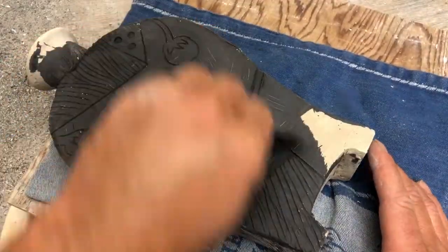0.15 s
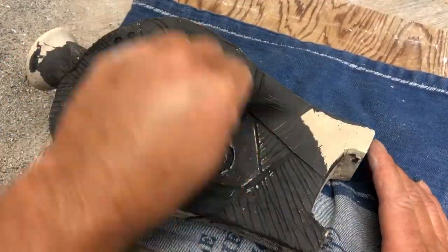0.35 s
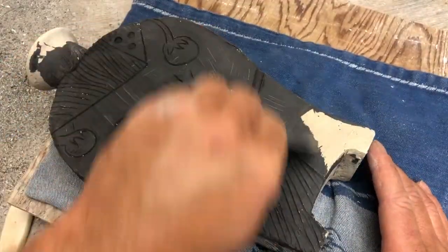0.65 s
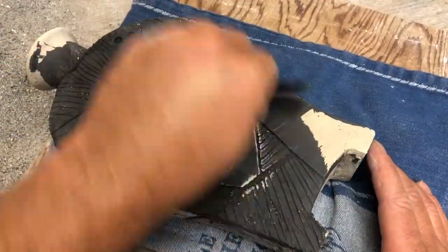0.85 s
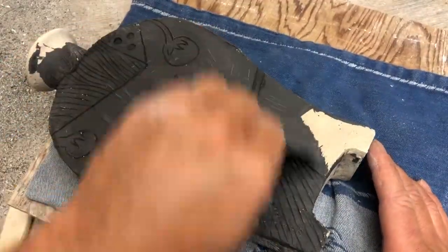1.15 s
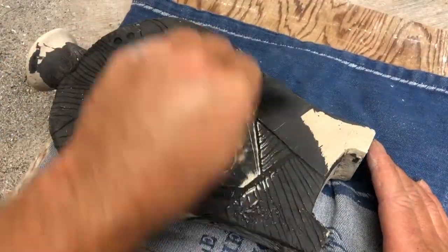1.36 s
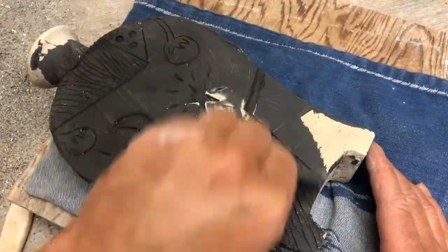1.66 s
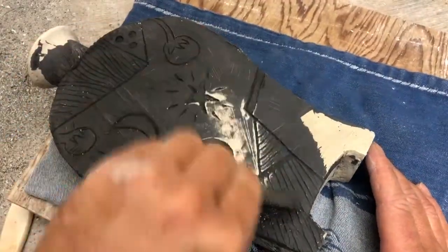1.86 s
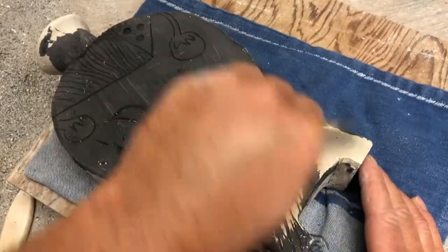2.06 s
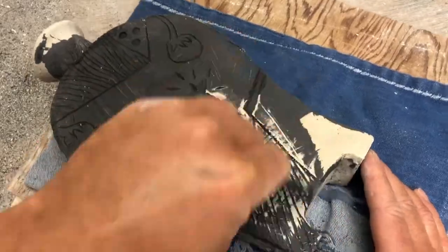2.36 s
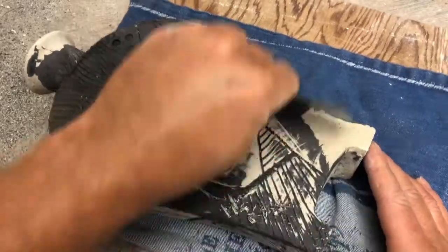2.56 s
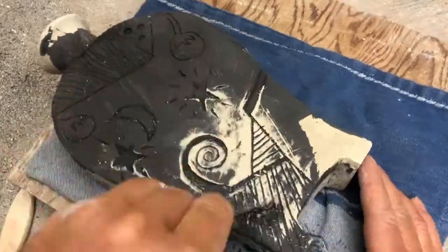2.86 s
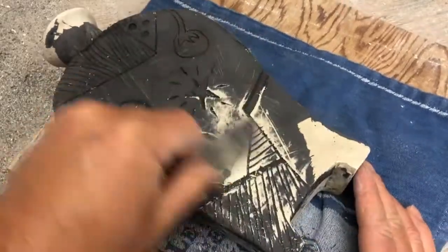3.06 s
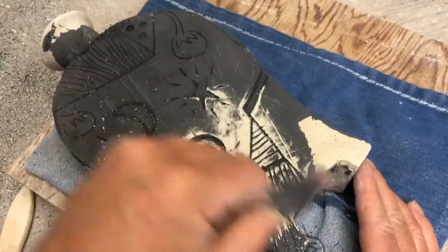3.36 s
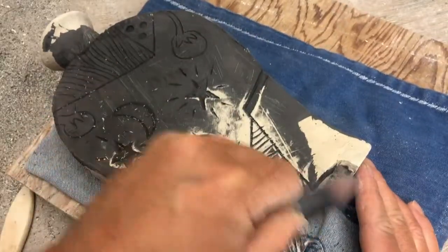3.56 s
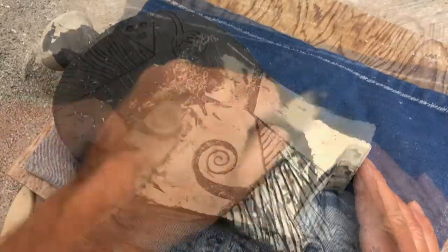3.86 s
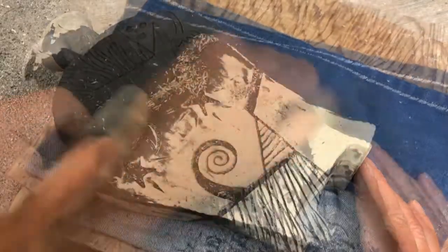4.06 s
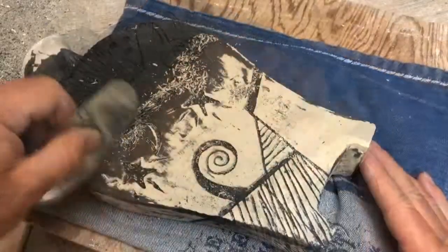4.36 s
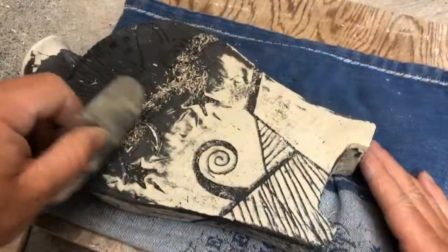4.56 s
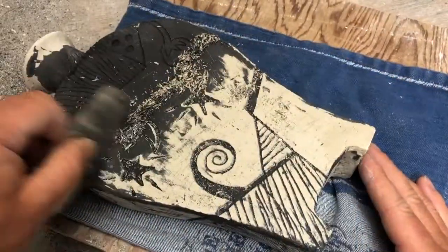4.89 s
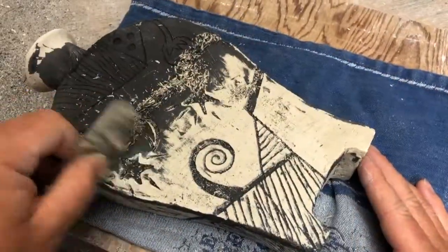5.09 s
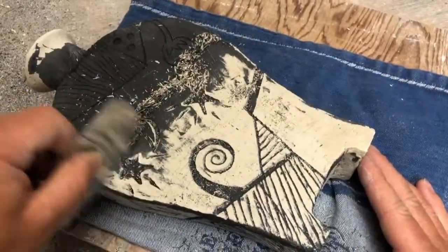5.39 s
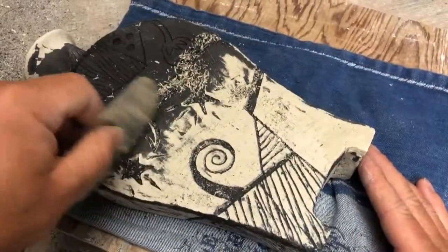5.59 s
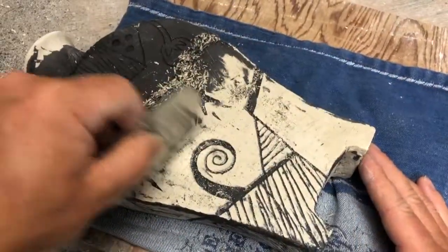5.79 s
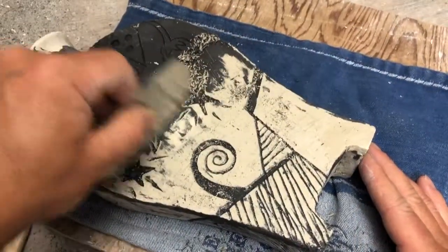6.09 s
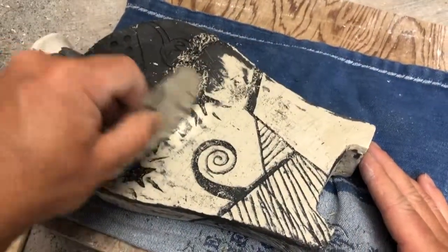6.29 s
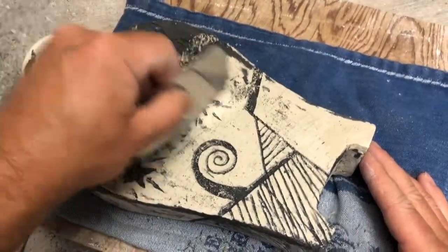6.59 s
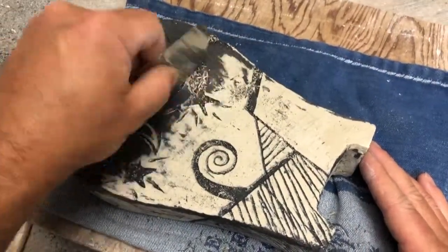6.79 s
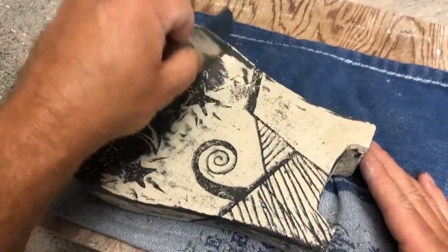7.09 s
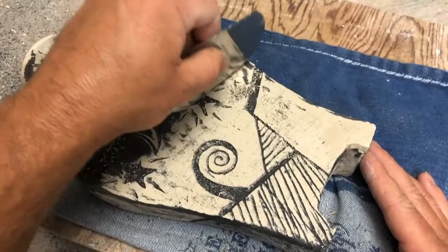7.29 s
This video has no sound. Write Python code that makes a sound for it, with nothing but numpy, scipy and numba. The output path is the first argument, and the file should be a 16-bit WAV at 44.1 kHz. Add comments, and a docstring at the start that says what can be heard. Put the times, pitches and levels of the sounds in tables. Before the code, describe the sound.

A thin steel blade scrapes dry, gritty coating off a hollow clay form in short repeated rasps, with soft knocks and snaps.

```python
"""Gritty rasps follow one another, each opened by a tick and a low knock, with snaps in between.
A thin steel rib scrapes dry underglaze off a hollow clay form lying on cloth on a work table.
Random grains of force drive the rasp, powder hiss, blade and clay; landings and snags ring decaying modes.
Each landing rocks the table, and twice the form creeps on the cloth with a short groan.
A small studio, close microphone: a short reverb, with steady rumble, hiss and a faint high whine."""
import sys
import numpy as np
from scipy import signal
from scipy.fft import rfft, irfft
from scipy.io import wavfile
from scipy.ndimage import uniform_filter1d, map_coordinates
from numba import njit

SR = 44100
rng = np.random.default_rng(int(sys.argv[2]) if len(sys.argv) > 2 else 0)


def master(y):
    """Save y as 16-bit WAV."""
    cut = np.clip(np.atleast_2d(y).T, -1, 1)
    pcm = np.round(cut * 32767)  # scale
    wavfile.write(sys.argv[1], SR, pcm.astype(np.int16))


N = 328118
RING = np.arange(SR // 2) / SR  # time axis of one event [s]

# All levels in the tables are relative; each source function adds its own trims.
# Steady air of the studio: (frequency [Hz], density [dB per Hz])
STUDIO_SPECTRUM = [(20, -6.5), (42, 3), (104, -14.5), (368, -16), (552, -26.5), (997, -31.5), (2850, -35.5),
                   (4500, -33), (6730, -38.5), (10900, -40), (15500, -49.5)]
# The table rocking: (frequency [Hz], level [dB], t60 [s])
TABLE_MODES = [(80.1, 1.5, 0.17), (43, -6, 0.61)]
# The form creeps on the cloth: (start [s], length [s], first pitch [Hz], last pitch [Hz], level [dB])
CREEP_GROANS = [(3.031, 0.067, 197, 93.5, -42), (6.194, 0.06, 168, 126, -44)]
# The edge snags in a groove: (time [s], level [dB], treble share [dB])
GROOVE_SNAGS = [(.346, -38.5, -5), (2.283, -34, -3), (2.298, -33, -24), (2.675, -33.5, -8),
                (2.705, -32, -16), (2.739, -28, -18), (3.128, -28, -30), (3.881, -37.5, 7),
                (3.958, -37, -18), (3.984, -32.5, 7.5), (4.335, -38, -9), (4.768, -38, 10),
                (4.818, -23.5, -26), (5.137, -37, 6), (5.152, -33, -14), (5.427, -33.5, 9.5),
                (5.477, -8, -21), (5.742, -30.5, 5.5), (5.83, -9, -32), (6.175, -31, -13),
                (6.757, -32.5, 4), (7.158, -33.5, 10)]
# The blade lands: (time [s], tick [dB], knock [dB], table thump [dB], ping relative to the tick [dB])
BLADE_LANDINGS = [(.196, -53, -53, -39.5, -15), (.712, -49, -51.5, -37.5, 3),
                  (1.171, -55.5, -49.5, -40, -1), (1.688, -53.5, -54, -40, -18),
                  (2.153, -58, -54, -42, -12), (2.578, -52, -48, -34, -2), (2.998, -53, -51.5, -35.5, 3.5),
                  (3.393, -53.5, -47.5, -34, 1), (3.804, -58, -45.5, -32, -8),
                  (4.229, -57, -58, -38.5, -24), (4.694, -47, -66, -38.5, -22),
                  (5.061, -42.5, -58.5, -33, -6), (5.368, -49.5, -55, -27, -8),
                  (5.709, -54, -69, -29.5, -27), (6.101, -44, -66, -32.5, -6),
                  (6.552, -59.5, -66, -42.5, -20), (7.004, -47.5, -60, -31, -7),
                  (7.378, -53, -54.5, -34, -20)]
# Scraping strokes: (start [s], lift [s], level [dB], hardest moment [share of stroke 0-1],
# powder hiss [dB], clay body [dB], blade ring [dB], flex ring [dB])
SCRAPE_STROKES = [(.206, 0.437, -44.5, 0.57, -3, 0.5, -0.5, -1), (.729, 0.944, -45, 0.43, -3.5, 0, -3, -4),
                  (1.2, 1.432, -44.5, 0.55, -2.5, -2, -2, -4.5),
                  (1.703, 1.905, -42.5, 0.37, -1, -2, -3, -0.5),
                  (2.162, 2.371, -42.5, 0.52, 1, -4.5, -0.5, 0.5),
                  (2.596, 2.75, -45.5, 0.4, -1, 1, -2, 2.5), (3.007, 3.19, -51, 0.38, -2, 2, -3, -3),
                  (3.407, 3.588, -49, 0.22, -2.5, 2.5, -2, -6.5),
                  (3.835, 4.016, -46, 0.54, -3, -0.5, -2, -7),
                  (4.237, 4.399, -46.5, 0.48, -2.5, -0.5, -3.5, -6.5),
                  (4.702, 4.854, -49, 0.47, -1.5, 5, -4, -6),
                  (5.071, 5.192, -44.5, 0.33, -5.5, -1, -32, -20.5),
                  (5.4, 5.497, -46.5, 1, 3, 5, -16, -14.5), (5.737, 5.862, -44, 0.8, -1, 1, -30, -30),
                  (6.112, 6.192, -42, 0.86, -1.5, 4, -30, -30),
                  (6.564, 6.771, -47.5, 0.39, 1, 1.5, -1.5, -6.5),
                  (7.011, 7.183, -45.5, 0.39, 0.5, -1.5, -4, -12),
                  (7.4, 7.527, -40.5, 0.22, -3.5, -8, -9.5, -24)]
# The blade brushes the clay on its way back: (start [s], lift [s], level [dB])
RETURN_BRUSHES = [(0.691, 0.698, -55), (4.142, 4.169, -59.5), (4.469, 4.561, -59.5), (6.288, 6.374, -70.5),
                  (6.883, 6.942, -57), (6.963, 6.988, -57)]
# Every brush: (hardest moment [0-1], powder hiss [dB], clay body [dB], blade ring [dB], flex ring [dB])
BRUSH_CHARACTER = (0.7, -2.5, -5, -11, -3.5)
# Hollow clay form: (frequency [Hz], level [dB], t60 [s])
CLAY_MODES = [(745, 2, 0.045), (910, 1, 0.045), (1088, 2, 0.034), (1367, -7.5, 0.095), (1562, -6, 0.13),
              (1766, -4, 0.11), (1890, -3.5, 0.045), (2554, 7.5, 0.032), (3760, -7.5, 0.032),
              (4610, -7, 0.092)]
# The form knocking on its padding: (frequency [Hz], level [dB], t60 [s])
KNOCK_MODES = [(200.6, -3, 0.28), (258.3, -1, 0.069), (356, 5, 0.11), (593, -14.5, 0.081)]
# The form's belly under the dragging edge: (frequency [Hz], level [dB])
BELLY_MODES = [(750, -5.5), (2600, -2), (3650, 1.5), (4750, 0), (7300, -0.5)]
# Short rings of the wall where the blade lands: (nominal frequency [Hz], level [dB])
WALL_MODES = [(800, 4.5), (1430, 0.5), (2180, -3.5), (2850, 0), (3700, -4.5), (5000, -8.5)]
# How freely the form rings where the tool works, most over its hollow belly: (time [s], level [dB])
HOLLOWNESS = [(4.4, -1), (4.7, 1), (6.2, -3.5), (6.6, -4)]
# The blade's ping drops as the grip shifts: (time [s], nominal frequency [Hz])
PING_PITCH = [(4.2, 2906), (5.06, 2200)]
# Modes of the steel rib: (mid-stroke frequency [Hz], rise over a stroke [share], width [Hz])
BLADE_RING = (3000, .08, 320)
FLEX_RING = (2100, .55, 380)
# Spectra of edge, flying powder, clay body, snap and tick: (frequency [Hz], density [dB per Hz])
RASP_SPECTRUM = [(300, -23), (950, 7), (1300, 0.5), (2600, 1.5), (5500, 7.5), (7000, -5.5), (15000, -9)]
POWDER_SPECTRUM = [(2500, -22), (5000, -22.5), (6500, 9), (8000, 11), (9300, 12), (12000, 12), (13500, 5),
                   (16000, -6)]
BODY_SPECTRUM = [(60, 12), (250, -5), (450, 1), (700, -2), (1050, 0), (1500, 1), (2300, -19.5),
                 (5000, -71.5)]
SNAP_SPECTRUM = [(200, -10), (600, -5), (1400, -1), (2600, -6), (3200, -12.5), (4000, -6.5), (8000, -15.5),
                 (15000, -41)]
TICK_SPECTRUM = [(500, -4.5), (2500, -3), (9000, -22), (15000, -32)]


def undb(db):
    """Decibels to gain."""
    return 10 ** (np.asarray(db) / 20)


def unit(response):
    """Scale a response to energy 1."""
    return response / np.sqrt(np.sum(response ** 2))


def through(x, response):
    """Pass a sound through a response."""
    return signal.fftconvolve(x, response)[:len(x)]


def add(track, s, sound):
    """Mix a sound into a track at time s."""
    i = int(s * SR)
    track[i:i + len(sound)] += sound[:max(N - i, 0)]


def colour(points, size=len(RING)):
    """Minimum-phase response with the given spectrum, energy 1."""
    hz, db = np.transpose(points)
    grid = np.maximum(np.fft.rfftfreq(size, 1 / SR), 1)
    gain = undb(np.interp(np.log(grid), np.log(hz), db))
    cepstrum = irfft(np.log(gain))
    # folding the cepstrum makes the response causal
    cepstrum[1:size // 2] *= 2
    cepstrum[size // 2 + 1:] = 0
    return unit(irfft(np.exp(rfft(cepstrum))))


def modes(mode_table):
    """Decaying sines; neighbouring modes swing in opposite directions."""
    total = np.zeros(len(RING))
    for k, (hz, db, t60) in enumerate(mode_table):
        decay = undb(db - 60 * RING / t60)
        total += (-1) ** k * decay * np.sin(2 * np.pi * hz * RING)
    return total


def walk(rate, count):
    """Random wander in straight lines between normal draws of spread 1, about rate draws per second."""
    step = max(int(SR / rate), 1)
    points = rng.standard_normal(count // step + 2)
    return np.interp(np.arange(count) / step, np.arange(len(points)), points)


@njit
def resonance(x, hz, width):
    """State-variable band-pass with a moving centre."""
    y, band, low = np.empty(len(x)), 0., 0.
    for i in range(len(x)):
        g, k = np.tan(np.pi * hz[i] / SR), width / hz[i]
        v = (band + g * (x[i] - low)) / (1 + g * (g + k))
        band, low, y[i] = 2 * v - band, low + 2 * g * v, k * v
    return y


def hollow(s):
    """How freely the form rings under the tool at time s; dB."""
    return np.interp(s, *np.transpose(HOLLOWNESS))


def studio():
    """Steady room rumble and hiss from shaped noise, with a faint high whine from a narrow resonance."""
    air_db, whine_db = -59, -87
    whine_hz, whine_width_hz = 11300.0, 40.0
    air = through(rng.standard_normal(N), colour(STUDIO_SPECTRUM))
    whine = resonance(rng.standard_normal(N), np.full(N, whine_hz), whine_width_hz)
    return undb(air_db) * air + undb(whine_db) * whine / np.std(whine)


def room(x):
    """Dense early reflections from the work table, then the walls' tail; the treble dies first."""
    early_db, wet_db, treble_db = -8, -10, -1
    early_t60, low_t60, high_t60 = 0.11, 0.31, 0.27  # s
    first_s, split_hz = 0.0028, 5000
    noise = rng.standard_normal((3, len(RING))) * (RING > first_s)
    low = signal.sosfilt(signal.butter(2, split_hz, fs=SR, output="sos"), noise[0])
    high = signal.sosfilt(signal.butter(2, split_hz, "high", fs=SR, output="sos"), noise[1])
    fade = -np.log(1000) * RING
    tail = low * np.exp(fade / low_t60) + undb(treble_db) * high * np.exp(fade / high_t60)
    early = noise[2] * np.exp(fade / early_t60)
    return x + through(x, undb(early_db) * unit(early) + undb(wet_db) * unit(tail))


def table():
    """The hand's weight rocks the table; the drag keeps it trembling, and it springs back at the lift."""
    lag_s, push_s, drag_s = 0.01035, 0.0094, 0.17
    thump_db, drag_db, rebound_db = 5.5, -11, 7
    rock = modes(TABLE_MODES)
    push = np.sin(np.pi * np.minimum(RING / push_s, 1)) ** 2
    thump = through(rock, push / push.sum())
    out = np.zeros(N)
    for s, _, _, db, _ in BLADE_LANDINGS:
        drag = rng.standard_normal(len(RING)) * np.exp(-RING / drag_s)
        tremble = through(drag, unit(rock))
        add(out, s + lag_s, undb(db) * (undb(thump_db) * thump + undb(drag_db) * tremble))
    for _, lift, db, *_ in SCRAPE_STROKES:
        add(out, lift - push_s, -undb(db + rebound_db) * thump)
    return out


def creeping():
    """The form slips on the cloth in a few slowing cycles."""
    out = np.zeros(N)
    for s, length, first_hz, last_hz, db in CREEP_GROANS:
        progress = np.minimum(RING / length, 1)
        pitch = first_hz * (last_hz / first_hz) ** progress
        phase = 2 * np.pi * np.cumsum(pitch) / SR
        cycles = np.sin(phase) + 0.15 * np.sin(2 * phase)
        swell = np.sqrt(4 * progress * (1 - progress))
        add(out, s, undb(db) * swell * cycles)
    return out


def crack(points, chatter_s, chatter_db):
    """A sharp contact, then a brief chatter of the edge, evened out to the given spectrum; energy 1."""
    chatter = rng.standard_normal(len(RING)) * np.exp(-RING / chatter_s)
    force = undb(chatter_db) * unit(chatter)
    force[0] += 1
    hz, db = np.transpose(points)
    grid = np.fft.rfftfreq(len(RING), 1 / SR)[1:]
    # subtract the force's own smoothed spectrum from the wanted one
    ripple = 10 * np.log10(uniform_filter1d(np.abs(rfft(force)) ** 2, size=60)[1:])
    wanted = np.interp(np.log(grid), np.log(hz), db)
    return unit(through(force, colour(np.column_stack([grid, wanted - ripple]))))


def snags():
    """The edge leaves a groove: a light snag stutters out, a hard one snaps quickly against the clay."""
    snap_db, clay_db, chips_db = 10, -2.5, -8
    hard_db, hard_span_db = -14, 16  # level of a fully hard snag, and the fall to a fully light one
    snap_s, stutter_s = 0.0022, 0.0038
    clay = unit(modes(CLAY_MODES))
    out = np.zeros(N)
    for s, db, treble in GROOVE_SNAGS:
        lightness = np.clip((hard_db - db) / hard_span_db, 0, 1)
        chatter_s = snap_s + lightness * (stutter_s - snap_s)
        snap = crack(SNAP_SPECTRUM, chatter_s, chatter_db=17)
        chips = undb(treble + chips_db) * crack(POWDER_SPECTRUM, chatter_s=0.0028, chatter_db=6)
        add(out, s, undb(db + snap_db) * (snap + chips + undb(clay_db + hollow(s)) * clay))
    return out


def landings():
    """The blade ticks and pings on the clay wall; the form knocks on its padding, damped by the hand."""
    tick_db, wall_db, knock_db, clay_db, ping_db = 21, 3, 5, -8, 2
    wall_t60, ping_t60 = 0.031, 0.028  # s
    most_damping = 18  # per second
    clay = unit(modes(CLAY_MODES))
    out = np.zeros(N)
    for s, tick, blow, _, ring in BLADE_LANDINGS:
        # grip and damping differ a little each time
        grip = 1 + .025 * rng.uniform(-1, 1)
        hold = rng.random()
        ping_hz = np.interp(s, *np.transpose(PING_PITCH)) * grip
        ping = unit(modes([(ping_hz, 0, ping_t60)]))
        wall = unit(modes([(hz * grip, db, wall_t60) for hz, db in WALL_MODES]))
        knock = modes(KNOCK_MODES) * np.exp(-RING * most_damping * hold)
        touch = crack(TICK_SPECTRUM, chatter_s=0.0029, chatter_db=20)
        touch += undb(wall_db) * wall + undb(clay_db + hollow(s)) * clay
        touch += undb(ping_db + ring) * ping
        add(out, s, undb(tick + tick_db) * touch - undb(blow + knock_db) * knock)
    return out


def grit(count, rate=9000, spread_db=1.0):
    """Grains of all sizes break off, rate per second, under an edge that judders over patches; rms 1."""
    breaks = rng.random(count) < rate / SR
    size = undb(spread_db * np.minimum(rng.exponential(size=count), 5))
    size = size * rng.choice([-1, 1], count)
    judder_db = 3.0 * walk(330, count)
    patches_db = 2.94 * walk(55, count)
    force = breaks * size * undb(judder_db + patches_db)
    return force / np.std(force)


def blade(force, progress, hz, bend, width_hz):
    """A damped mode of the rib, rising as the stroke bends it and wavering with the grip; rms 1."""
    waver = 1 + .035 * walk(30, len(force))
    centre = hz * waver * (1 + bend * (progress - .5))
    ring = resonance(force, centre, float(width_hz))
    return ring / np.std(ring)


def effort(progress, crest):
    """The hand leans in up to the hardest moment of a stroke and eases off towards the lift; dB."""
    bite_db, ease_db = -15.5, -8.5  # at the start and at the lift, below the hardest moment
    arch_power = 1.96  # higher = flatter top
    crest = np.clip(crest, .1, .9)
    before = np.maximum(1 - progress / crest, 0)
    after = np.maximum((progress - crest) / (1 - crest), 0)
    return bite_db * before ** arch_power + ease_db * after ** arch_power


def near_echoes(x, progress):
    """Reflections from hand, clay and table shift as the blade travels and comb the spectrum."""
    nearest_s, farthest_s = 0.000459, 0.0028  # before the shift
    echo_db, travel, count = -14, 0.253, 3  # travel: largest change of lag, as a share
    index = np.arange(len(x))
    out = x.copy()
    for place, direction in rng.random((count, 2)):
        lag = nearest_s + place * (farthest_s - nearest_s)
        lag = lag * (1 + travel * (2 * direction - 1) * progress)
        out += undb(echo_db) * map_coordinates(x, [index - lag * SR], order=3)
    return out / np.sqrt(1 + count * undb(echo_db) ** 2)


def scraping():
    """Each stroke or brush drives a rasp, a powder hiss, the blade's modes and the clay body."""
    attack_s, release_s = 0.0042, 0.0098
    rasp_db, powder_db, body_db, ring_db, flex_db = -4.5, -6.5, -3, -3, -5.5
    knock_db, clay_db, belly_db, belly_t60 = -13, -10, -3, 0.0025  # t60 in s
    brighten_db, deepen_db = 4, 8  # rise of powder and of body over a stroke
    count = len(RING)
    rasp, powder = colour(RASP_SPECTRUM), colour(POWDER_SPECTRUM)
    thud = colour(BODY_SPECTRUM) + undb(knock_db) * unit(modes(KNOCK_MODES))
    clay = unit(modes(CLAY_MODES))
    belly = unit(modes([(hz, db, belly_t60) for hz, db in BELLY_MODES]))
    brushes = [(*brush, *BRUSH_CHARACTER) for brush in RETURN_BRUSHES]
    out = np.zeros(N)
    for start, lift, db, crest, hiss, low, ring, flex in SCRAPE_STROKES + brushes:
        length = lift - start
        progress = np.clip(RING / length, 0, 1)
        contact = np.minimum(RING / attack_s, 1) * np.exp(-np.maximum(RING - length, 0) / release_s)
        pressure = contact * undb(db + effort(progress, crest))
        force = grit(count, rate=5000, spread_db=2.4)
        steel = undb(ring + ring_db) * blade(grit(count), progress, *BLADE_RING)
        steel += undb(flex + flex_db) * blade(grit(count), progress, *FLEX_RING)
        sound = through(force * pressure, undb(rasp_db) * rasp) + steel * pressure
        sound += through(grit(count) * pressure * undb(belly_db + hollow(start)), belly)
        # powder gathers ahead of the edge
        powder_gain = undb(hiss + powder_db + brighten_db * progress)
        sound += through(grit(count) * pressure * powder_gain, powder)
        # the edge digs in deeper towards the end
        body = thud + undb(clay_db + hollow(start)) * clay
        body_gain = undb(low + body_db + deepen_db * (progress - 1))
        sound += through(force * pressure * body_gain, body)
        add(out, start, near_echoes(sound, progress))
    return out


def scene():
    """Tool sounds in the room, over the table's thumps, the creeping form and the studio air."""
    tool = room(scraping() + landings() + snags())
    return (tool + table() + creeping() + studio())[None]


def record(dry):
    """The recorder cuts the top above 15750 Hz with a steep low-pass."""
    return signal.sosfilt(signal.ellip(10, .1, 60, 15750, fs=SR, output="sos"), dry)


dry = scene()
out = record(dry)
master(out)
```